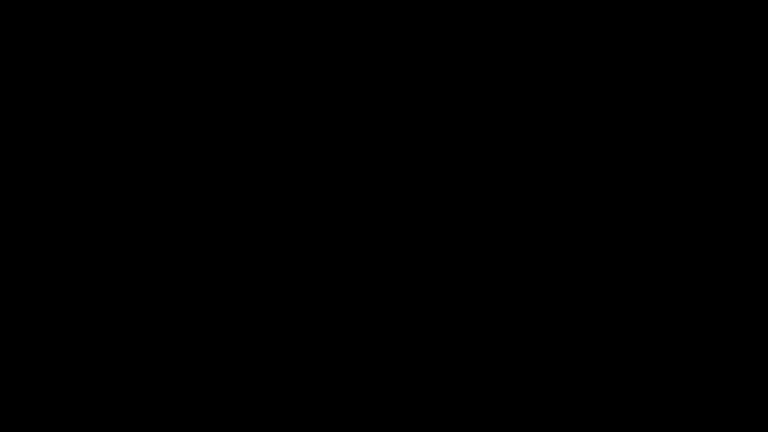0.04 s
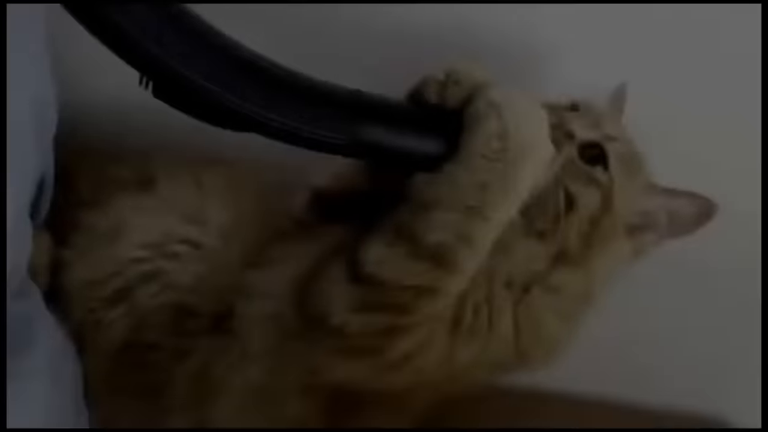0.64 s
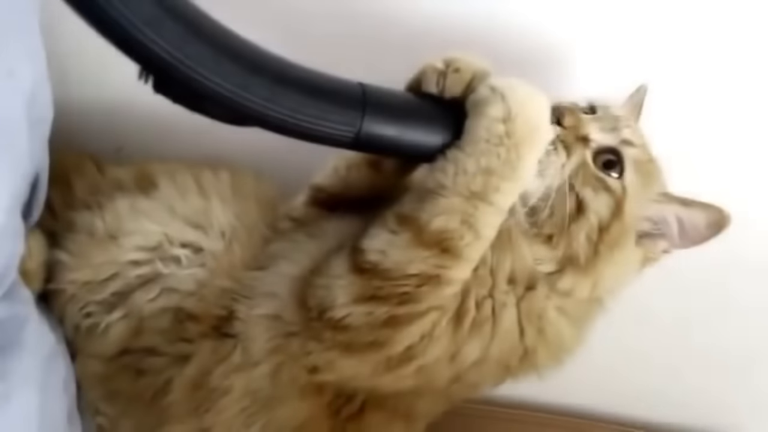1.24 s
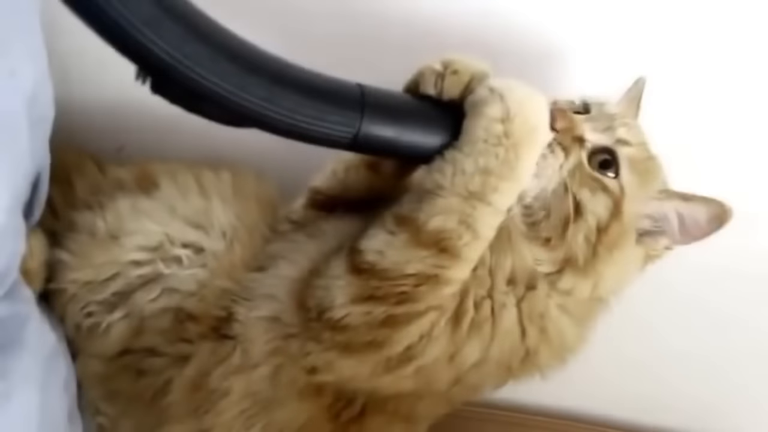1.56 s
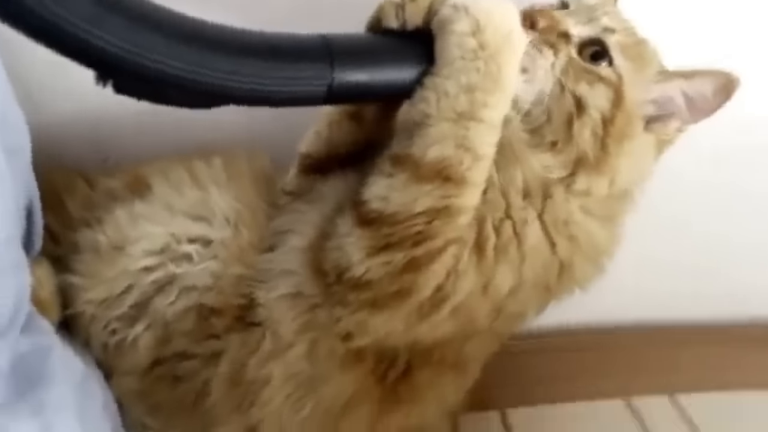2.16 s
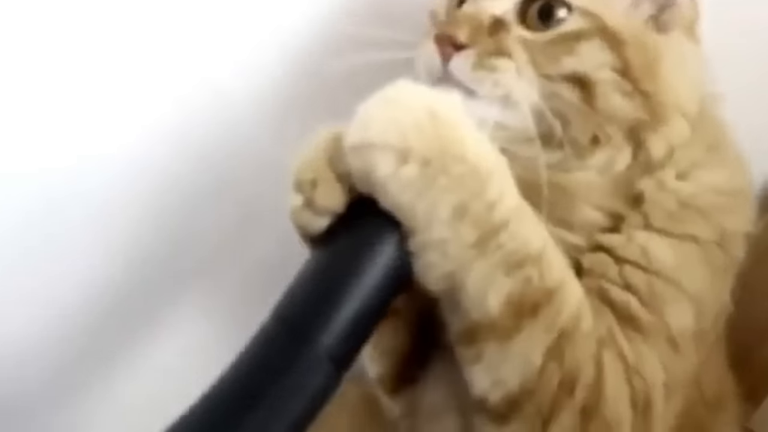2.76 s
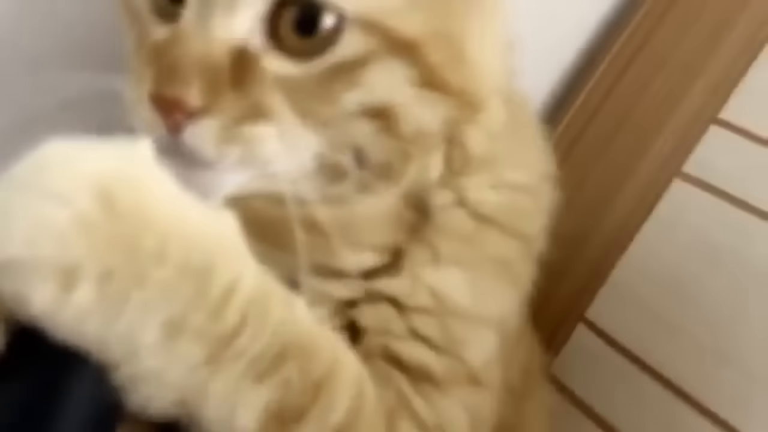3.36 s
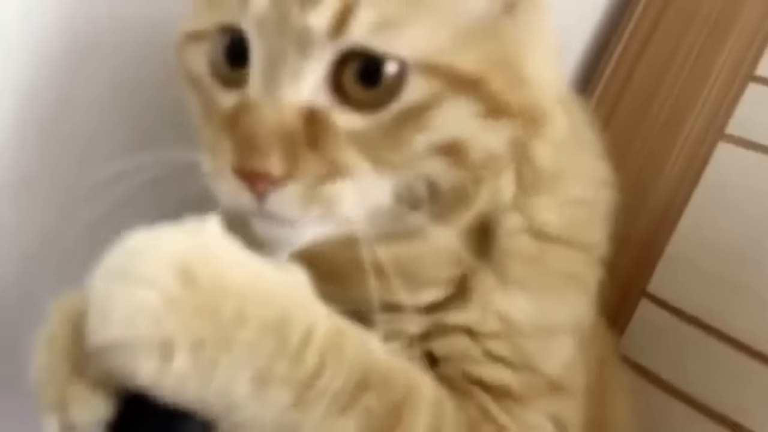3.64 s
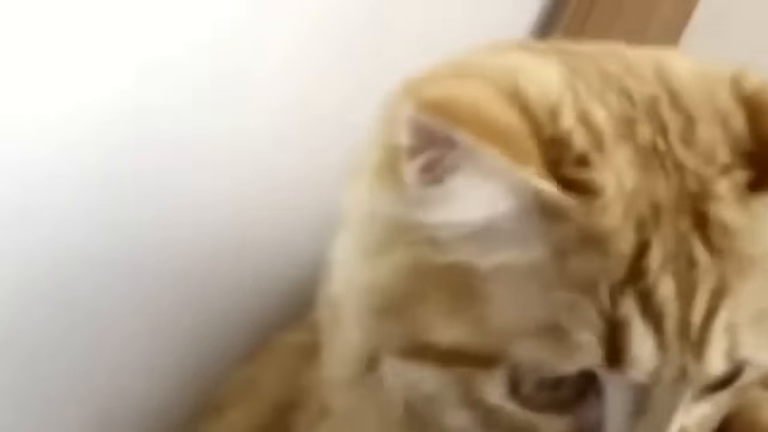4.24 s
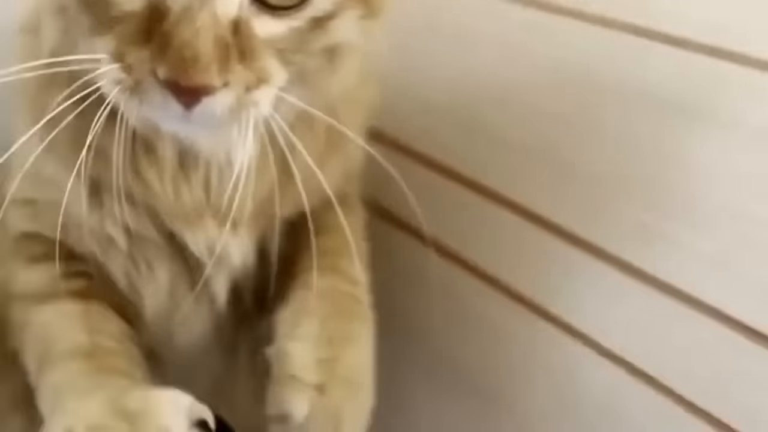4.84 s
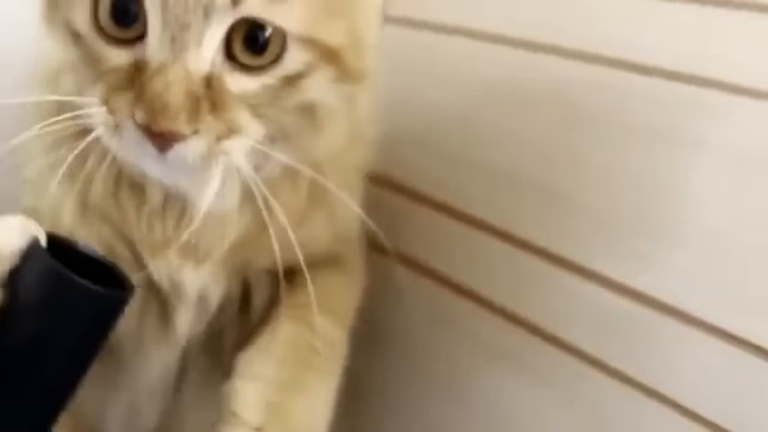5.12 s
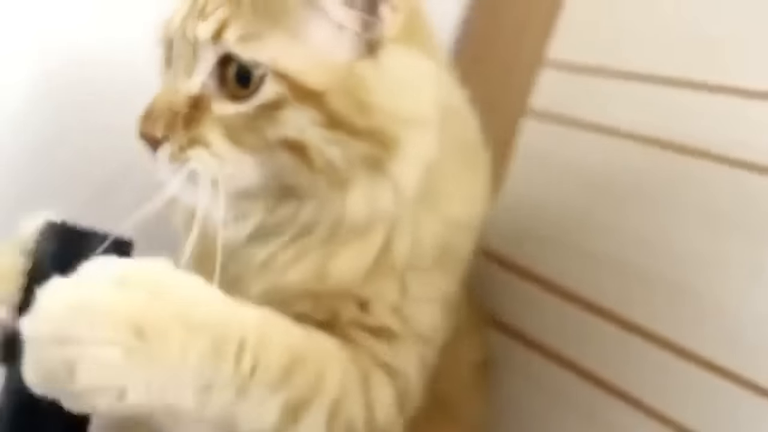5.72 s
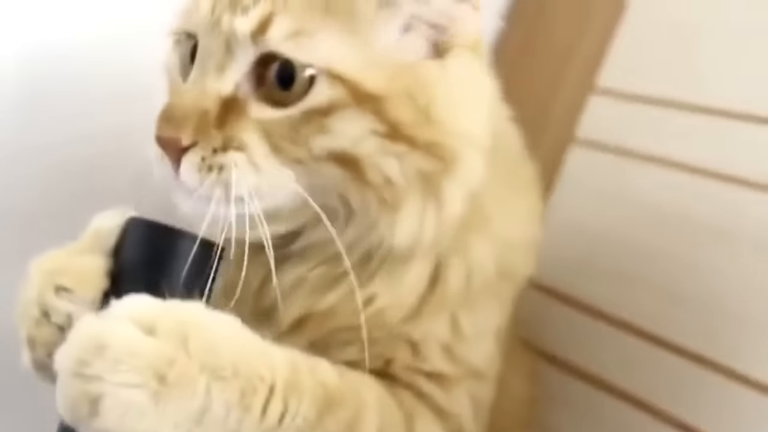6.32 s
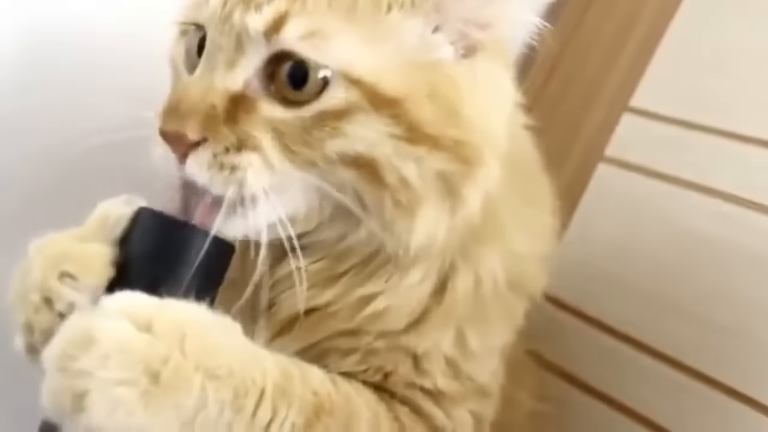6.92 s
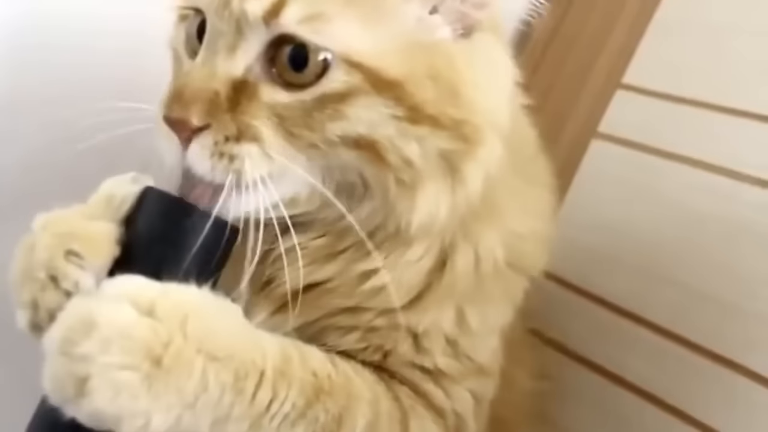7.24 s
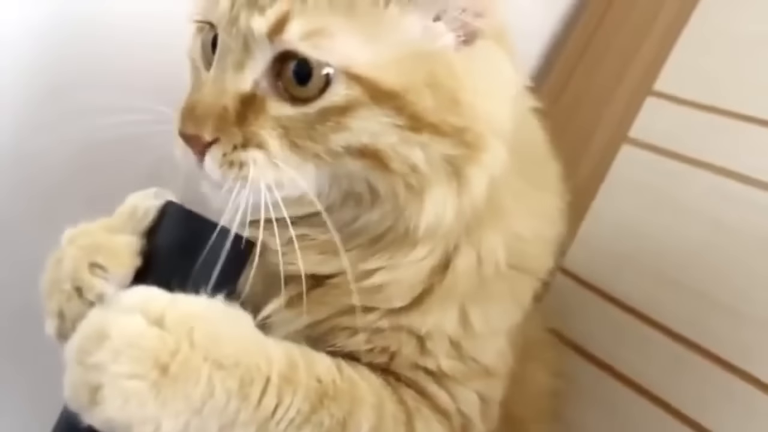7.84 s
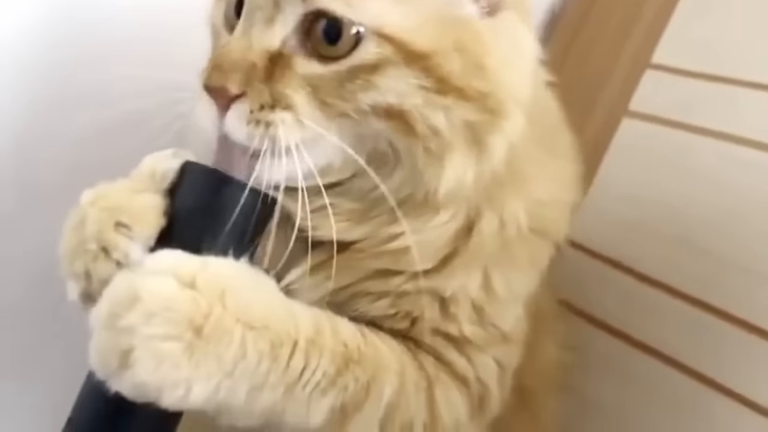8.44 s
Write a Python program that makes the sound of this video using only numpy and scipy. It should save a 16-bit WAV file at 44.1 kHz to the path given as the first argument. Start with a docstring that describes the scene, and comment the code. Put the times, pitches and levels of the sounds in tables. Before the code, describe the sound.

Steady vacuum suction with a thin whistle, broken by short fluttering sputters as a cat's fur and tongue block the opening.

```python
"""A small room: a vacuum cleaner runs while a cat hugs the hose and licks its open end.
Turbulent air rushes into the nozzle; the hollow between paw, face and nozzle rings and adds a moving
reflection. The fan whistles, the motor hums. Fur or tongue sucked over the opening flaps: a low burr
and a string of wet, squeaky slaps. The recorder's automatic gain, set here as timed dips, ducks air
and machine on each bout of flapping, then steadily comes back."""
import sys
import numpy as np
from scipy import signal
from scipy.fft import rfft, irfft
from scipy.io import wavfile
from scipy.ndimage import uniform_filter1d, map_coordinates

SR = 44100
rng = np.random.default_rng(int(sys.argv[2]) if len(sys.argv) > 2 else 0)


def store_wav(level_fs):
    """Save 16-bit WAV to argv[1]."""
    pcm = np.round(np.clip(np.atleast_2d(level_fs), -1, 1) * 32767)
    wavfile.write(sys.argv[1], SR, pcm.T.astype(np.int16))


N = 378378
TIME = np.arange(N) / SR
HZ = np.maximum(np.fft.rfftfreq(N, 1 / SR), 1)

# intake, before trim and duck: (time [s], rush [dB], hiss [dB])
AIR_LEVELS = [(0.6, -23, -29), (1.05, -19, -25.5), (1.44, -20.5, -24), (2.4, -21.5, -27.5),
              (2.85, -22, -27.8), (3.13, -21, -26), (3.42, -20, -24), (3.88, -20, -25), (4.2, -21.5, -29),
              (4.9, -21, -28.5), (5.35, -18.5, -26.5), (6.25, -19, -26.5), (7.0, -18, -26.5),
              (8.0, -19, -26.5), (8.58, -18.5, -25.5)]
# grip on the hose, remainder is free nozzle: (time [s], in fur [power share], at mouth [power share])
GRIP = [(2.2, 1, 0), (2.45, 0.48, 0), (2.8, 0.1, 0), (3.2, 0.065, 0), (5.7, 0.28, 0.18), (6.4, 0.089, 0.93)]
# air spectrum per grip: (frequency [Hz], relative density [dB])
FUR_SPECTRUM = [(100, -19), (250, -8), (450, -0.5), (750, -4.5), (1300, -3.5), (2000, -4), (3200, 1.5),
                (4600, 1), (6000, 0), (8300, -2), (13500, -13.5)]
FREE_SPECTRUM = [(100, -19), (250, -12), (450, -1), (750, -2), (1300, 4), (2000, 1.3), (3200, -0.5),
                 (4600, -5), (6000, -4), (8300, -7.5), (13500, -16)]
MOUTH_SPECTRUM = [(100, -45), (250, -22), (450, -1), (750, -1.5), (1300, -0.5), (2000, 1.5), (3200, 1.5),
                  (4600, -7.5), (6000, -3.5), (8300, -6.5), (13500, -16.5)]
# nozzle resonances per grip: (centre [Hz], width [Hz], gain [dB])
FUR_PEAKS = [(420, 72, 1.5), (1820, 300, 6), (2450, 260, 0), (2910, 107, 2.5), (6450, 200, -6),
             (9700, 500, 2.5)]
FREE_PEAKS = [(540, 58, 1.3), (860, 100, 3), (1124, 54, 2.9), (1365, 18.7, 1.7), (1730, 240, 1.1)]
MOUTH_PEAKS = [(765, 67, 3.5), (1146, 140, 4), (1385, 82, 4), (2544, 110, 4.5), (2940, 145, 6.5),
               (3650, 360, -2.5), (3900, 300, 3), (4500, 410, 4)]
# hollow at the nozzle: (time [s], lowest mode [Hz], mode spacing [Hz], ring [dB], reflection [ratio])
HOLLOW = [(0.5, 1473, 1467, -9.5, 0.041), (0.93, 1455, 1438, -2, 0.078), (1.5, 1500, 1500, -39, 0.18),
          (2.35, 1650, 1860, -2.5, -0.015), (2.75, 1540, 1850, -13, 0.14), (3.1, 1630, 1950, -5, 0.23),
          (3.45, 2091, 1680, -1.5, .05), (3.87, 2853, 1780, -4, -0.29), (4.08, 1885, 1100, -9.5, -0.015),
          (4.33, 1843, 1850, -7, .1), (4.75, 1650, 1650, -7.5, -0.099), (5.0, 1250, 1239, -5.5, 0.086),
          (5.25, 1000, 898, -8, 0.017), (5.45, 1145, 880, -5.5, 0.099), (5.68, 1108, 1119, -2.5, .12),
          (5.95, 1500, 1250, -6, .2), (6.6, 1423, 1418, -15, .1), (8.1, 1560, 1350, -10.5, 0.29)]
# fan speed: (time [s], whistle pitch [Hz])
FAN_PITCH = [(0.3, 7210), (1.3, 7197), (1.75, 7240), (2.25, 7268), (2.8, 7205), (3.6, 7194), (4.2, 7203),
             (5.0, 7180), (6.3, 7190), (7.0, 7209), (8.58, 7203)]
# whistle swell: (time [s], base level [dB])
FAN_SWELL = [(0.65, -38), (1.0, -42), (2.55, -46), (2.72, -38), (2.9, -44), (3.1, -35), (3.22, -43),
             (3.39, -28), (3.58, -48), (3.82, -35), (4.1, -43), (5.22, -43), (5.38, -34), (5.55, -49),
             (6.9, -37.5), (8.58, -46)]
# fan partials: (pitch [multiple], offset [dB], swell [share])
FAN_PARTIALS = [(.5, -3, .3), (1, 4, 0.96), (1.5, -8.5, .25)]
# motor hum before duck: (time [s], base level [dB])
HUM_LEVEL = [(.5, -29.5), (1.25, -25.5), (2.0, -27.5), (2.65, -26.5), (3.3, -40.5), (6.1, -35.5),
             (8.58, -38.5)]
# hum lines: (frequency [Hz], offset [dB])
HUM_LINES = [(300.5, -14.5), (400.5, -5)]
# casing tones: (frequency [Hz], level [dB re rush])
CASING_LINES = [(62, -37.5), (100, -31), (495, -33.5), (527, -26.5), (905, -30.5), (1352, -21)]
# motor rumble: (frequency [Hz], relative density [dB])
RUMBLE_SPECTRUM = [(25, -20), (90, -8.5), (300, 0.5), (500, -55), (900, -70)]
# fur or tongue over the opening:
# (start [s], end [s], duck [dB], spit [dB], first flap rate [Hz], burr [dB], fundamental [dB re rest])
BLOCKS = [(0.536, 0.61, 2.5, -27, 110, -41, -11), (1.466, 1.656, 12.5, -22.5, 111.9, -30, -5.5),
          (1.945, 2.2, 6.5, -22, 100.6, -31, -9.5), (6.279, 6.385, 9, -22.5, 133.8, -31, -5),
          (6.59, 6.743, 9, -22.5, 111.8, -32, -8), (6.939, 7.12, 8.5, -20.5, 99, -32, -3.5),
          (7.367, 7.514, 8.5, -21.5, 111.6, -27, 2), (7.803, 7.887, 3, -21.5, 135.1, -29, -6),
          (8.16, 8.348, 7, -23.5, 106.8, -28, 1.5)]
# wet spit and dull thud: (frequency [Hz], relative density [dB])
SPIT_SPECTRUM = [(2500, -34), (4000, -2), (5700, -2.5), (7200, 7), (8500, -2), (10500, -5.5), (14000, -7.5)]
THUD_SPECTRUM = [(200, -17), (700, -7.5), (1600, -6), (2900, -6), (4200, -8), (6500, -6)]
# hose boom: (centre [Hz], width [Hz], gain [dB])
HOSE_MODES = [(165, 66, 10), (273, 18, 8)]
# loudest slaps: (time [s], level before trim and duck [dB], length [ms])
LOUD_SLAPS = [(1.4847, -18, 4.7), (1.5279, -9.5, 2.4), (1.6148, -12, 0.98), (1.996, -16, 3),
              (2.0645, -20, 4.9), (2.1135, -17, 2.4), (2.1589, -14, 2.7), (6.2874, -16, 2),
              (6.308, -12, 2.6), (6.3405, -11, 1.7), (6.6229, -15, 4), (6.7508, -15, 2.1),
              (6.9762, -14, 6.4), (7.047, -12, 2.7), (7.3885, -11, 3.2), (7.403, -14, 3),
              (7.8455, -16, 3.5), (8.1685, -11, 3.06), (8.1902, -9.5, 4.7), (8.324, -13.5, 2.15)]
# squeaks through the last narrow gap: (time [s], level [dB], length [ms], pitch [Hz])
SQUEAKS = [(1.578, -4.5, 1.3, 5970), (8.226, -15, 2.25, 6550)]

FLAP_DELAY_S, FLAP_STOP_S = 0.028, 0.0065   # after block start, before block end


def from_db(db):
    return 10 ** (np.asarray(db) / 20)


def unit_rms(x):
    return x / np.sqrt(np.mean(x ** 2) + 1e-20)


def curves(rows):
    """One per-sample curve for each column after time."""
    times_s, *columns = np.transpose(rows)
    return [np.interp(TIME, times_s, column) for column in columns]


def colour(x, spectrum, peaks=()):
    """Smooth spectrum plus bell resonances; rms 1."""
    hz, db = np.transpose(spectrum)
    gain_db = np.interp(np.log(HZ), np.log(hz), db)
    for centre_hz, width_hz, peak_db in peaks:
        gain_db += peak_db * np.exp(-2 * ((HZ - centre_hz) / width_hz) ** 2)
    return unit_rms(irfft(rfft(x) * from_db(gain_db), N))


def noise(spectrum, peaks=()):
    return colour(rng.standard_normal(N), spectrum, peaks)


def drift(rate_hz):
    """Smooth random wander; rms 1."""
    return unit_rms(low_pass(rng.standard_normal(N), rate_hz, order=1))


def low_pass(x, edge_hz, order=4):
    return irfft(rfft(x) / (1 + (HZ / edge_hz) ** (2 * order)), N)


def tone(hz):
    """Sine on a pitch curve; rms 1."""
    return np.sqrt(2) * np.sin(2 * np.pi * (np.cumsum(hz) / SR + rng.random()))


def gate(start_s, end_s, rise_s, fall_s):
    """Trapezoid, ramps centred on start and end."""
    return np.clip((TIME - start_s) / rise_s + .5, 0, 1) * np.clip((end_s - TIME) / fall_s + .5, 0, 1)


def burst(time_s, length_ms, rise=0.82, fall=0.94):
    """Envelope of a closing gap: a slightly skewed bell."""
    age = (TIME - time_s) * 1000 / length_ms
    return np.exp(-np.minimum(np.abs(age) / np.where(age < 0, rise, fall), 20) ** 2.7)


def airflow(rush_db, hiss_db, duck_db, covered, split_hz=4500, rush_trim_db=-0.26, hiss_trim_db=-1.06):
    """Turbulence at the lip, coloured by the grip; a block makes it spit and sputter."""
    fur, mouth = np.clip(curves(GRIP), 0, 1)
    free = np.clip(1 - fur - mouth, 0, 1)
    air = (np.sqrt(fur) * noise(FUR_SPECTRUM, FUR_PEAKS)
           + np.sqrt(free) * noise(FREE_SPECTRUM, FREE_PEAKS)
           + np.sqrt(mouth) * noise(MOUTH_SPECTRUM, MOUTH_PEAKS))
    air = hose_echo(hollow_reflection(air) + hollow_ring(duck_db))
    low = low_pass(air, split_hz)
    rush, hiss = [band / np.sqrt(uniform_filter1d(band ** 2, size=6000)) for band in (low, air - low)]
    rush *= from_db(rush_db + rush_trim_db - duck_db)
    hiss *= from_db(hiss_db + hiss_trim_db - 0.65 * duck_db)
    flow = rush + hiss + spitting(duck_db)
    gust_db, grain_db, sputter_db = 0.45 * drift(12), 0.12 * drift(510), 2.5 * drift(200)
    return flow * from_db(gust_db + grain_db + covered * sputter_db)


def hollow_reflection(x):
    """Late copy off the far side of the hollow; the comb sweeps as the hose moves."""
    _, spacing_hz, _, strength = curves(HOLLOW)
    delayed = map_coordinates(x, [np.arange(N) - SR / spacing_hz], order=3)
    return (x + strength * delayed) / np.sqrt(1 + strength ** 2)


def hollow_ring(duck_db, half_width_hz=320, best_hz=2950, span_octaves=0.85, waver_db=1):
    """The hollow rings as four evenly spaced noise bands that slide with its size."""
    lowest_hz, spacing_hz, ring_db, _ = curves(HOLLOW)
    quadrature = [unit_rms(low_pass(rng.standard_normal(N), half_width_hz, order=2)) for _ in range(2)]
    shift_hz = 55 * drift(7)
    ring = 0
    for k in range(4):
        hz = lowest_hz + k * spacing_hz + shift_hz
        phase = 2 * np.pi * np.cumsum(hz) / SR
        power = 1 / (1 + (2 * np.log2(hz / best_hz) / span_octaves) ** 2)
        quadrature = np.roll(quadrature, SR // 2, axis=1)   # decorrelates the bands
        band = quadrature[0] * np.cos(phase) + quadrature[1] * np.sin(phase)
        ring += np.sqrt(power) * from_db(waver_db * drift(2.4)) * band
    return ring * from_db(ring_db - 0.68 * duck_db)


def hose_echo(x, round_trip_s=0.0117, feedback=0.25):
    """Round trips in the hose rib the spectrum with close resonances."""
    return irfft(rfft(x) / (1 - feedback * np.exp(-2j * np.pi * HZ * round_trip_s)), N)


def fan(duck_db, wobble_hz=7.95, flutter_db=3, reference_db=-36.5):
    """Whistle roughened by the turbulent intake; dips as the gain ducks."""
    (pitch_hz,), (whistle_db,) = curves(FAN_PITCH), curves(FAN_SWELL)
    pitch_hz += wobble_hz * drift(50)
    base_db = reference_db - 0.64 * duck_db
    swell_db = whistle_db - reference_db
    return sum(tone(k * pitch_hz) * from_db(base_db + db + share * swell_db + flutter_db * drift(55))
               for k, db, share in FAN_PARTIALS)


def motor(rush_db, duck_db, rumble_re_rush_db=-23):
    """Mains hum, casing tones and rumble; all dip as the gain ducks."""
    hum_db, = curves(HUM_LEVEL)
    hum = sum(tone(hz + 0.86 * drift(9.2)) * from_db(hum_db + db + 0.73 * drift(26))
              for hz, db in HUM_LINES)
    casing = sum(tone(hz + 3 * drift(11.6)) * from_db(db + 2 * drift(3)) for hz, db in CASING_LINES)
    rumble = from_db(rumble_re_rush_db) * noise(RUMBLE_SPECTRUM)
    return from_db(-duck_db) * (hum + from_db(rush_db) * (casing + rumble))


def gain_duck(lift_db=0.5, lift_s=0.088, hold_s=0.022, release_db_per_s=33.5):
    """Recorder's automatic gain as a timed cut [dB] per block: attack, hold, steady release."""
    cut_db, lift = 0, 0
    for start_s, end_s, depth_db, *_ in BLOCKS:
        attack_db = depth_db * (TIME - start_s) / (end_s - start_s)
        release_db = depth_db - release_db_per_s * np.maximum(TIME - end_s - hold_s, 0)
        cut_db = np.maximum(cut_db, np.minimum(attack_db, release_db))
        lift += np.clip(1 - np.abs(TIME - start_s) / lift_s, 0, 1)   # slight swell at the onset
    return cut_db - lift_db * lift


def spitting(duck_db, rise_s=0.018, fall_s=0.062):
    """Sharp spit of air through each block's narrowing gap."""
    level = sum(gate(start_s, end_s, rise_s, fall_s) * from_db(db)
                for start_s, end_s, _, db, *_ in BLOCKS)
    return noise(SPIT_SPECTRUM) * level * from_db(-0.82 * duck_db)


def burr(covers, last_hz=90, jitter=0.07, rough_db=4.5):
    """Flapping fur or tongue chops the air, slowing as it is drawn in; the hose booms."""
    glides = []
    for start_s, end_s, _, _, first_hz, *_ in BLOCKS:
        glides += [(start_s + FLAP_DELAY_S, first_hz), (end_s, last_hz)]
    flap_hz, = curves(glides)
    phase = 2 * np.pi * np.cumsum(flap_hz * (1 + jitter * drift(83))) / SR
    pulses = sum(np.cos(k * phase) for k in range(2, 7)) * from_db(rough_db * drift(84))
    overtones = colour(pulses, [(50, -25), (130, 0), (330, -5), (700, -16)], HOSE_MODES)
    fundamental = np.sqrt(2) * np.cos(phase)
    flaps = 0
    for cover, (*_, burr_db, fundamental_db) in zip(covers, BLOCKS):
        weight = from_db(fundamental_db)
        flaps += cover * from_db(burr_db) * (overtones + weight * fundamental) / np.sqrt(1 + weight ** 2)
    return flaps


def small_slaps(rate_hz=50, jitter_s=0.003, level_db=-20.5, spread_db=4.5, length_ms=2.8):
    """The seal keeps breaking and closing during a block; rows as in LOUD_SLAPS."""
    times_s = np.concatenate([np.arange(start_s + FLAP_DELAY_S, end_s, 1 / rate_hz)
                              for start_s, end_s, *_ in BLOCKS])
    return [(rng.normal(time_s, jitter_s), rng.normal(level_db, spread_db), length_ms)
            for time_s in times_s]


def slaps(duck_db, trim_db=-0.26, thud_db=-2.5, thud_spread_db=6, edge_hz=11400):
    """The seal closes with a wet spit and a duller thud."""
    spit = noise(SPIT_SPECTRUM)
    thud = noise(THUD_SPECTRUM) * from_db(thud_db + thud_spread_db * drift(19))
    power = sum((burst(time_s, length_ms) * from_db(db + trim_db)) ** 2
                for time_s, db, length_ms in list(LOUD_SLAPS) + small_slaps())
    envelope = np.sqrt(power) * from_db(-0.18 * duck_db)
    return hollow_reflection(low_pass(envelope * (spit + thud), edge_hz, order=2))


def squeaks(waver=0.12):
    """Air squeaks through the last narrow gap."""
    bend = 1 + waver * drift(1180)
    return sum(burst(time_s, length_ms) * from_db(db) * tone(hz * bend)
               for time_s, db, length_ms, hz in SQUEAKS)


def lingering_tone(pitch_hz=100, level_db=-34, rise_s=0.022, t60_s=0.91):
    """A low tone dies away after the last flap."""
    age_s = TIME - BLOCKS[-1][1]
    onset = np.clip(age_s / rise_s + 1, 0, 1)
    return onset * from_db(level_db - 60 * np.maximum(age_s, 0) / t60_s) * tone(np.full(N, pitch_hz))


def scene():
    """Air, machine and flapping blocks; same in both channels."""
    rush_db, hiss_db = curves(AIR_LEVELS)
    duck_db = gain_duck()
    covers = [gate(start_s + FLAP_DELAY_S, end_s - FLAP_STOP_S, rise_s=0.012, fall_s=0.071)
              for start_s, end_s, *_ in BLOCKS]
    covered = np.minimum(sum(covers), 1)
    vacuum = airflow(rush_db, hiss_db, duck_db, covered) + fan(duck_db) + motor(rush_db, duck_db)
    mono = vacuum + burr(covers) + slaps(duck_db) + squeaks() + lingering_tone()
    return np.array([mono, mono])


def record(dry, start_s=0.26, fade_s=0.38, cutoff_hz=14150):
    """Fade-in, clip at full scale, steep low-pass."""
    faded = dry * np.clip((TIME - start_s) / fade_s, 0, 1)
    top_cut = signal.ellip(12, .1, 90, cutoff_hz, fs=SR, output="sos")
    return signal.sosfilt(top_cut, np.clip(faded, -1, 1))


dry = scene()
out = record(dry)
store_wav(out)
```